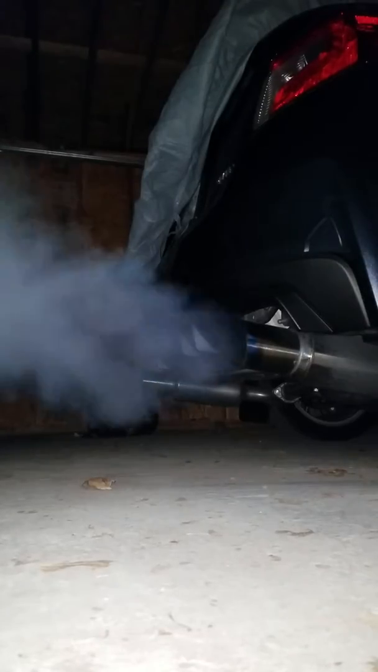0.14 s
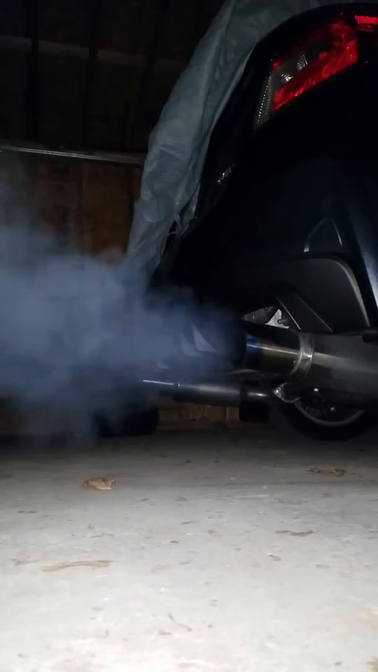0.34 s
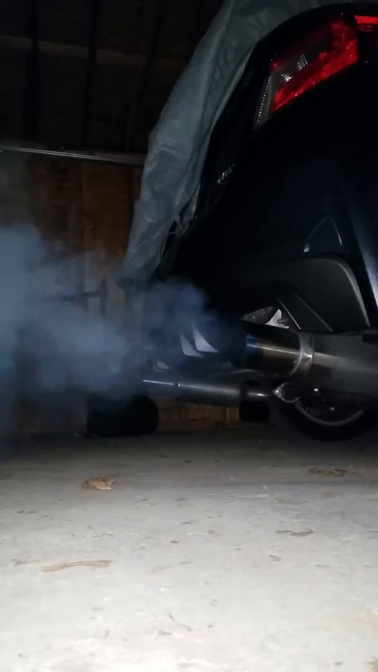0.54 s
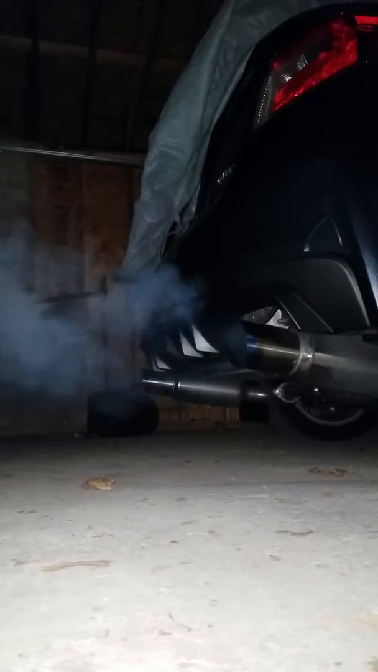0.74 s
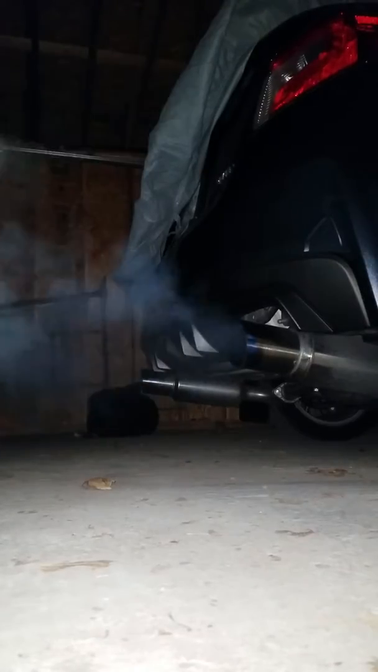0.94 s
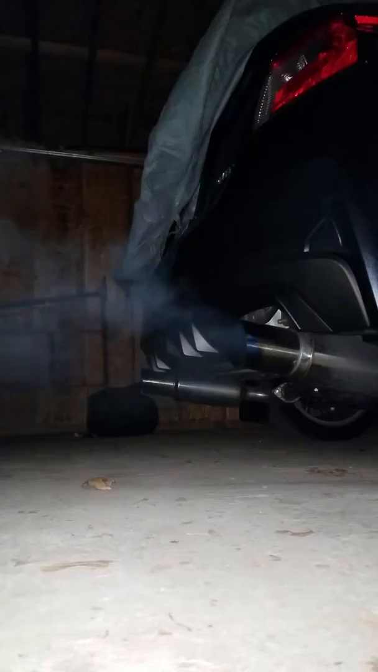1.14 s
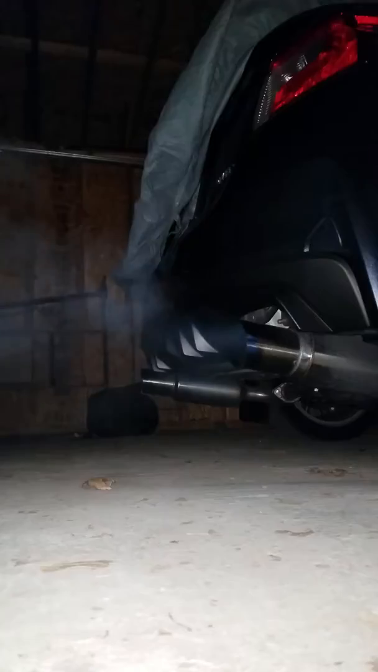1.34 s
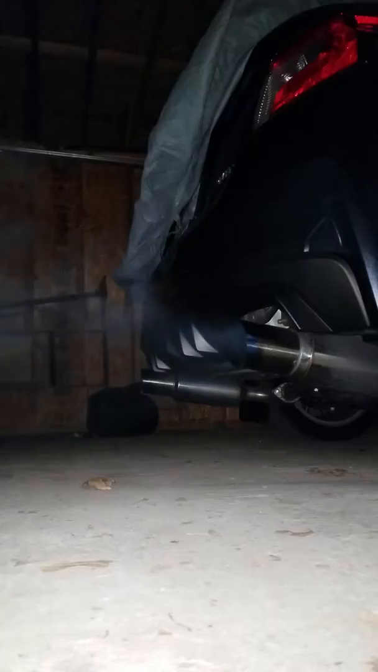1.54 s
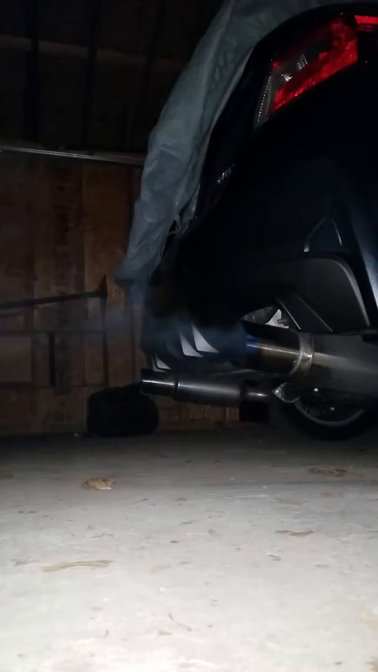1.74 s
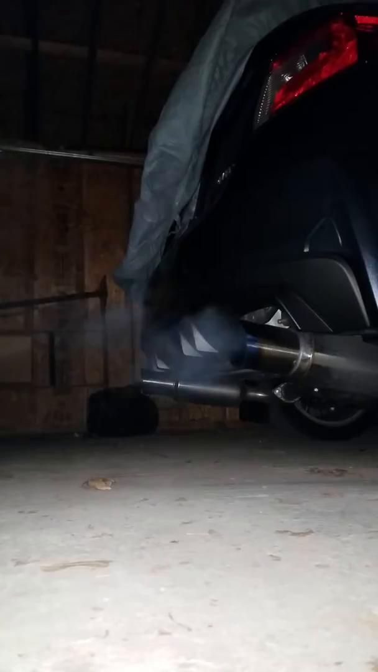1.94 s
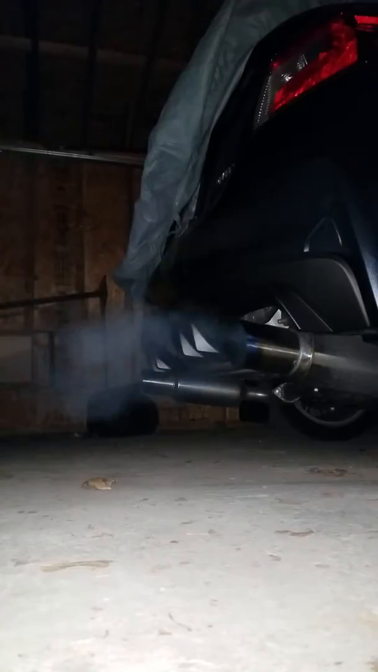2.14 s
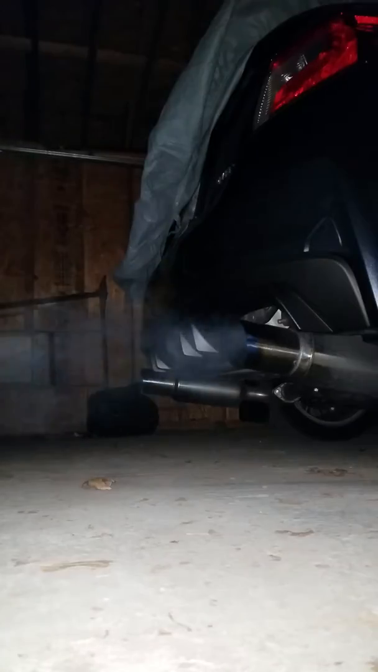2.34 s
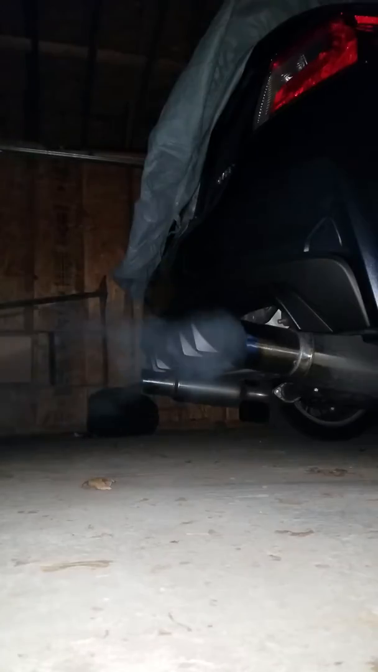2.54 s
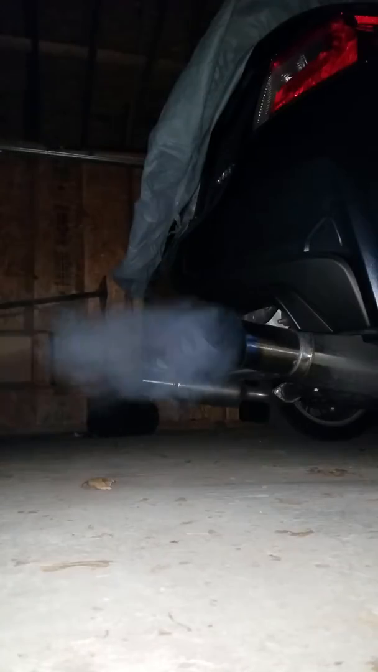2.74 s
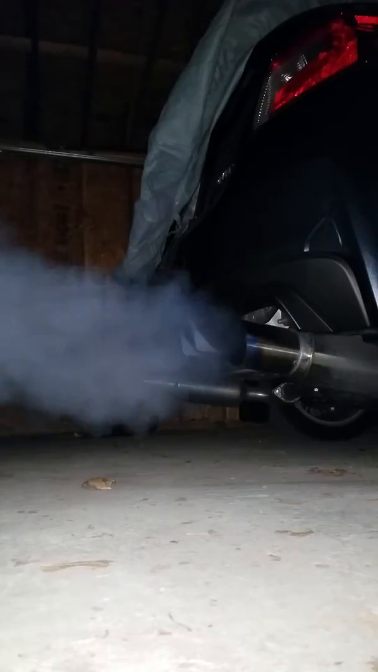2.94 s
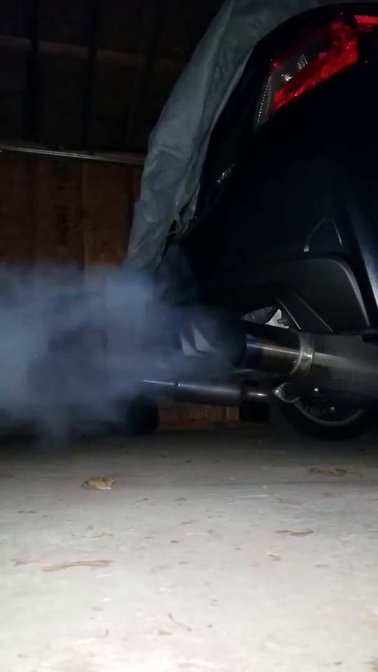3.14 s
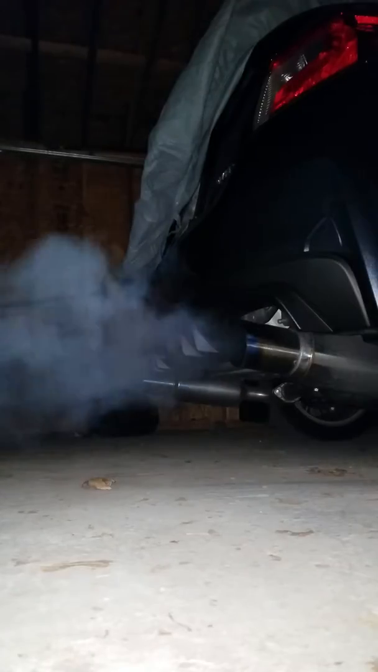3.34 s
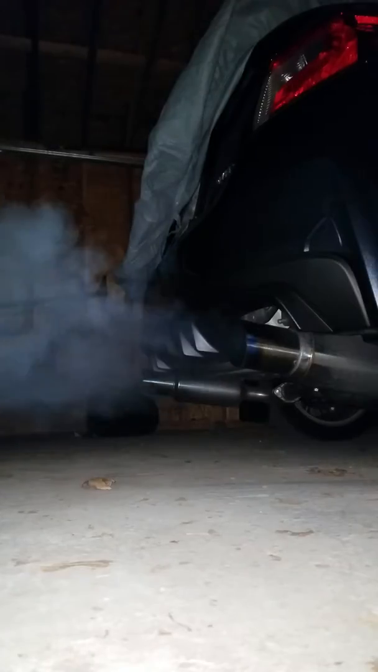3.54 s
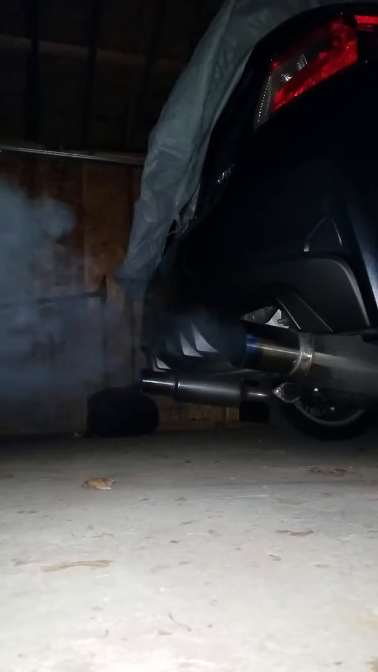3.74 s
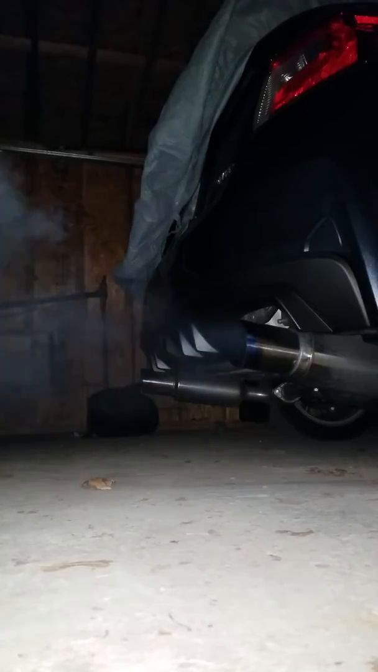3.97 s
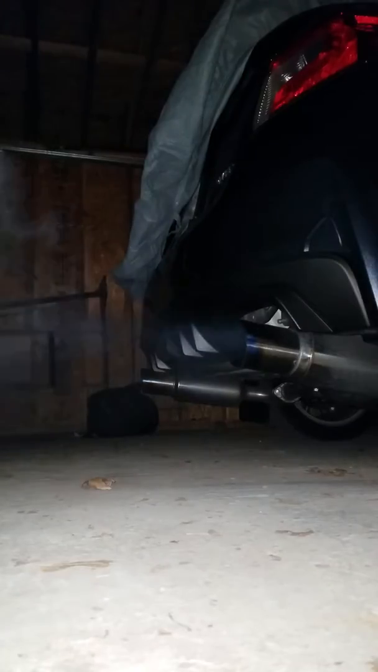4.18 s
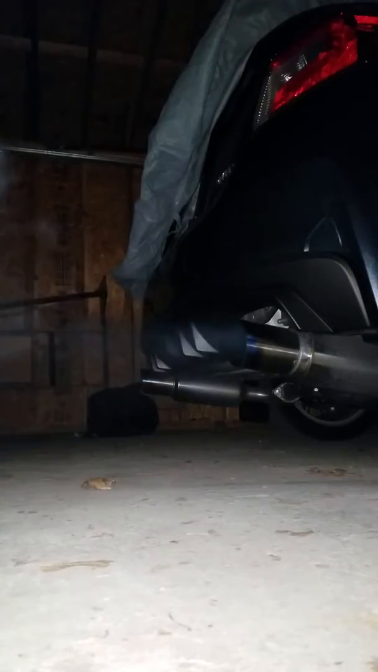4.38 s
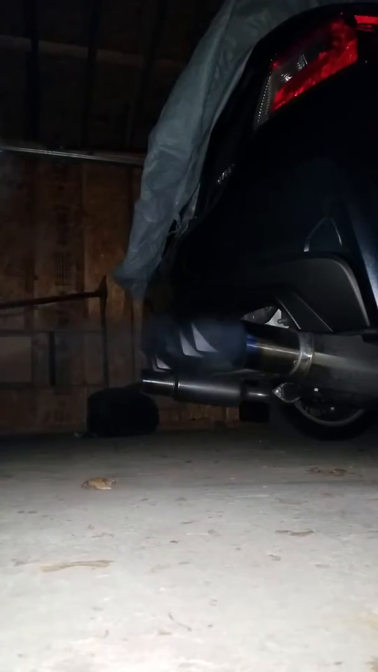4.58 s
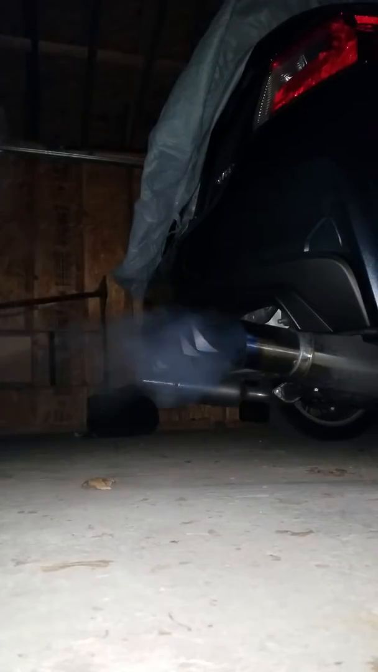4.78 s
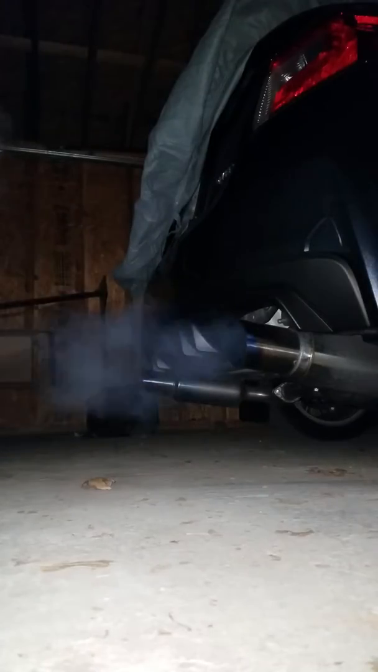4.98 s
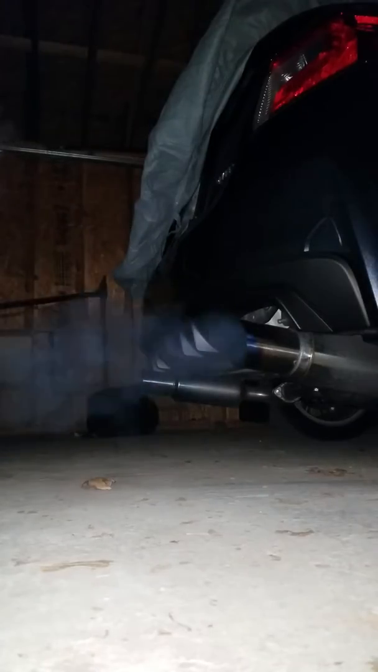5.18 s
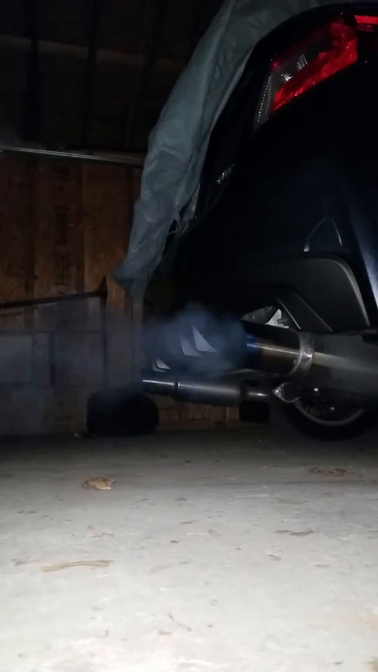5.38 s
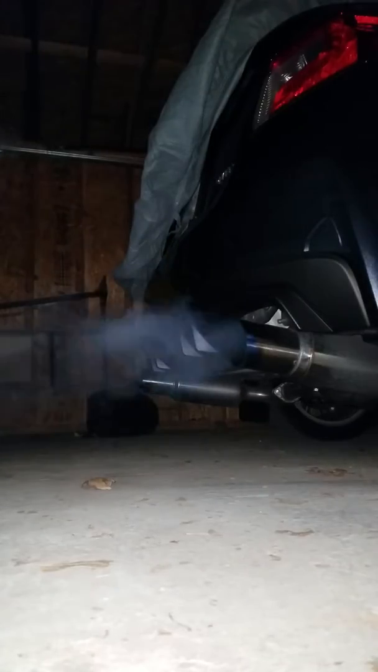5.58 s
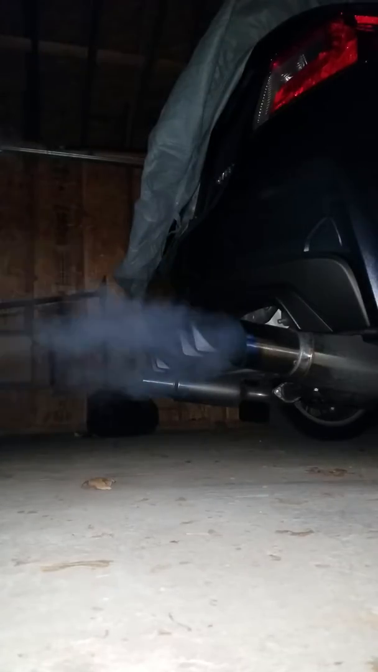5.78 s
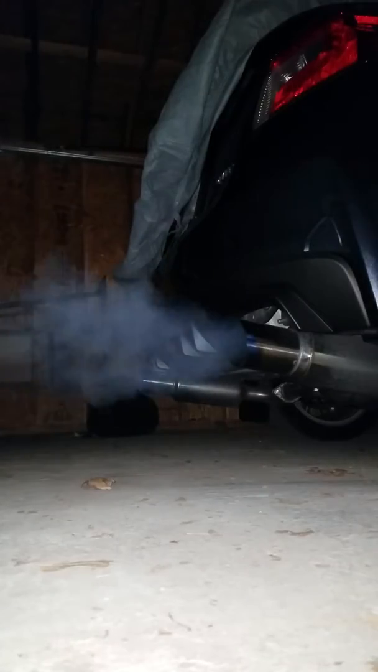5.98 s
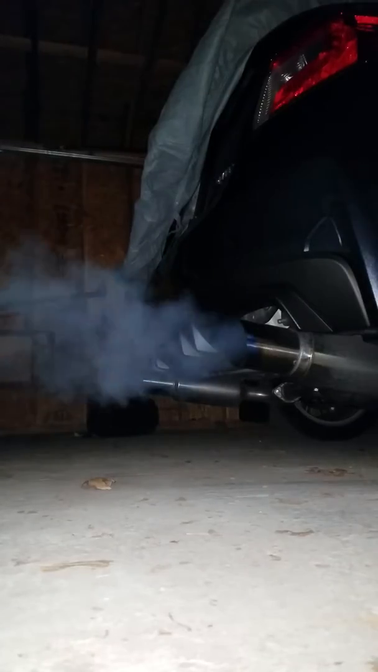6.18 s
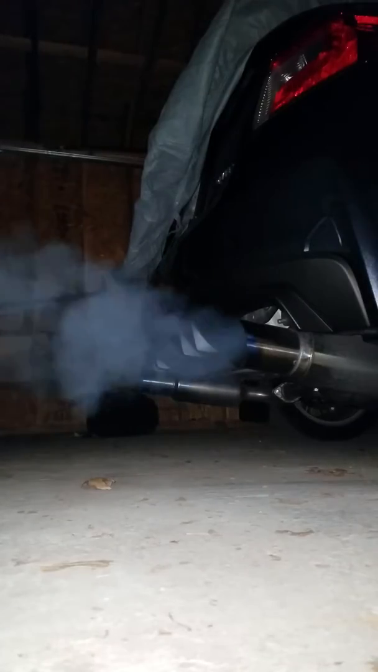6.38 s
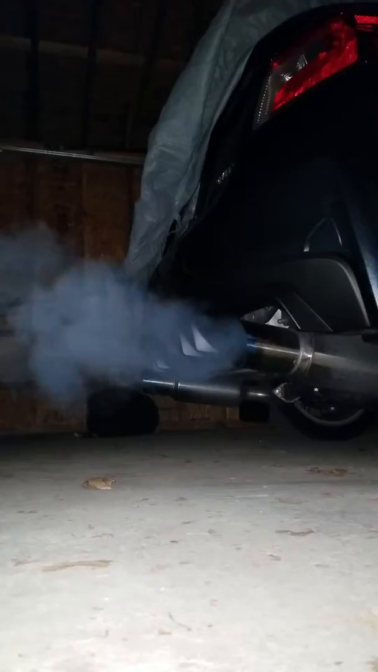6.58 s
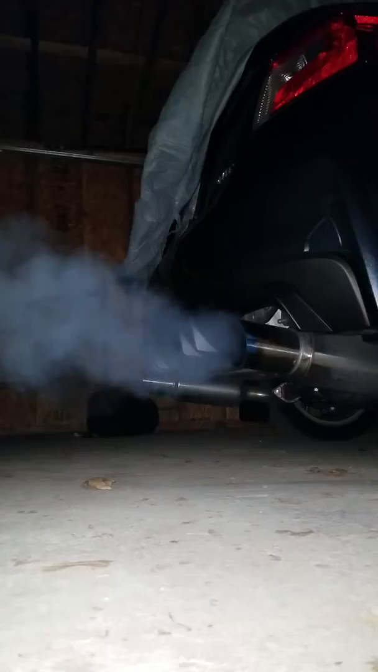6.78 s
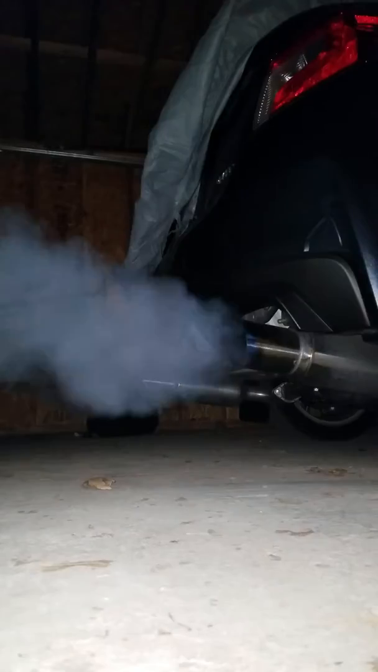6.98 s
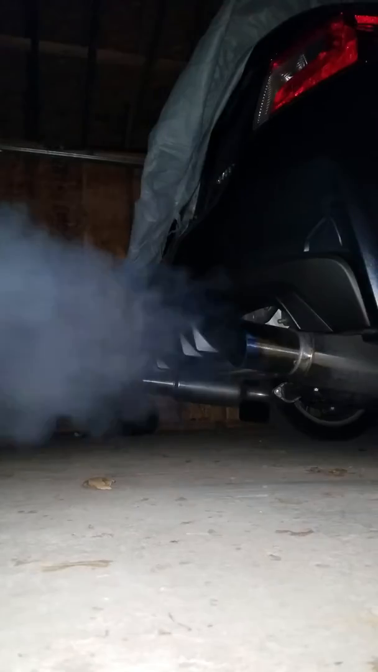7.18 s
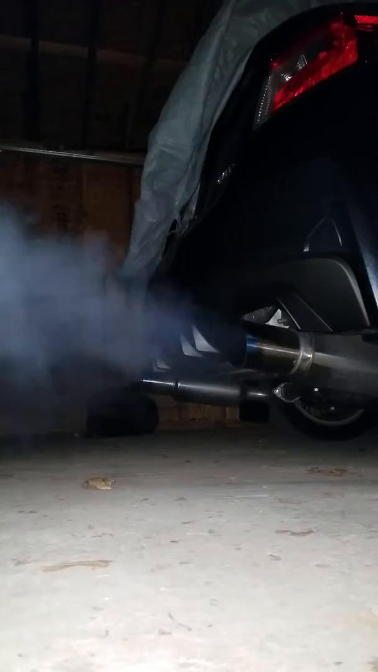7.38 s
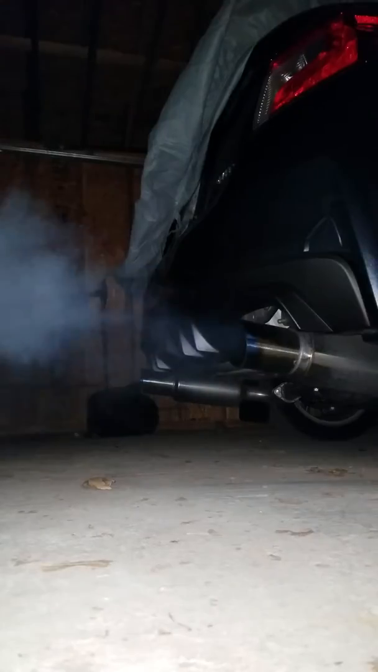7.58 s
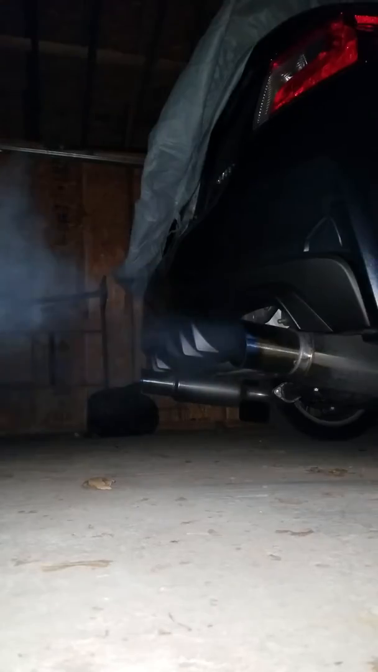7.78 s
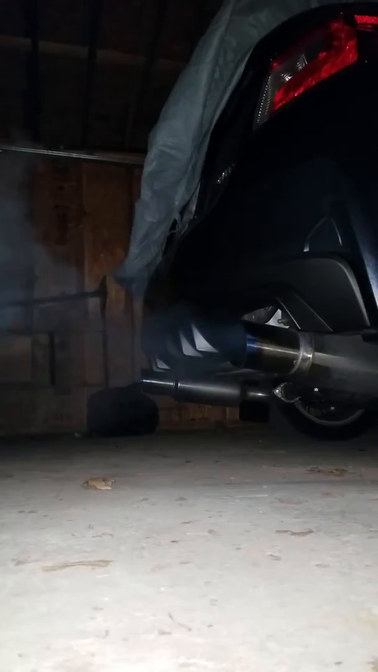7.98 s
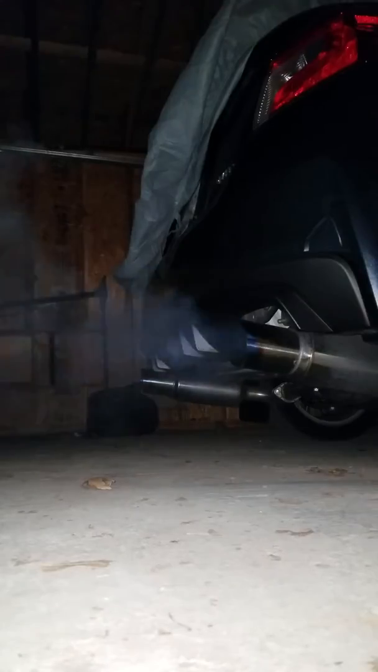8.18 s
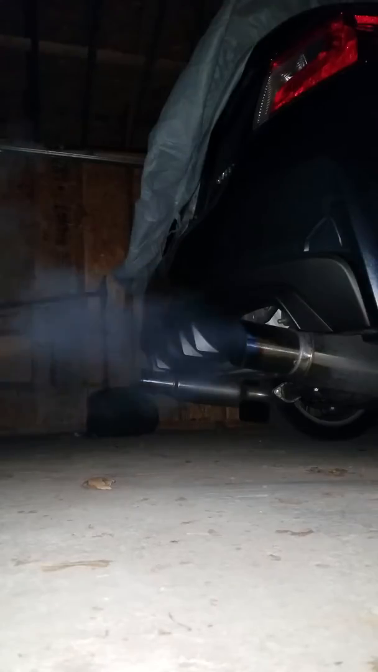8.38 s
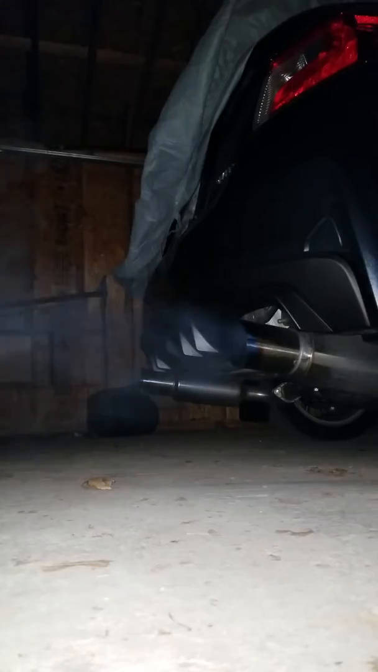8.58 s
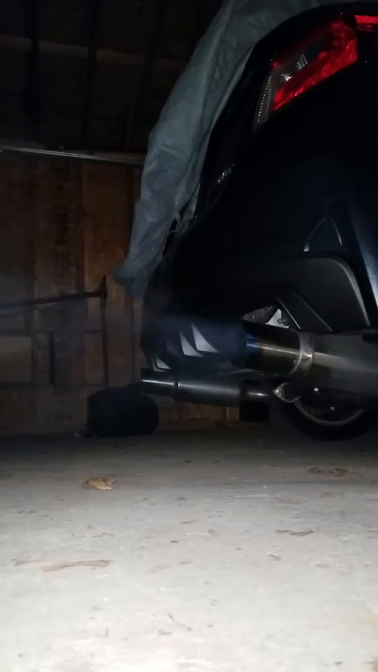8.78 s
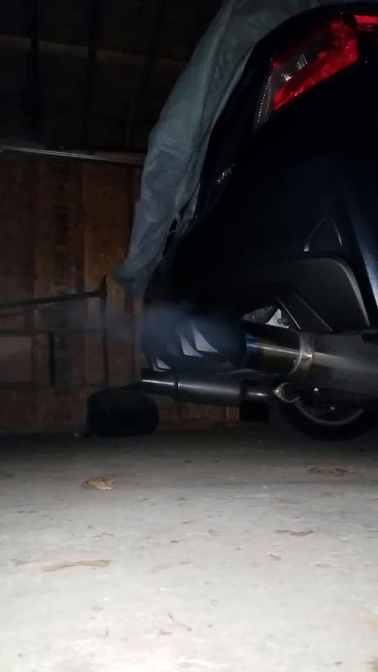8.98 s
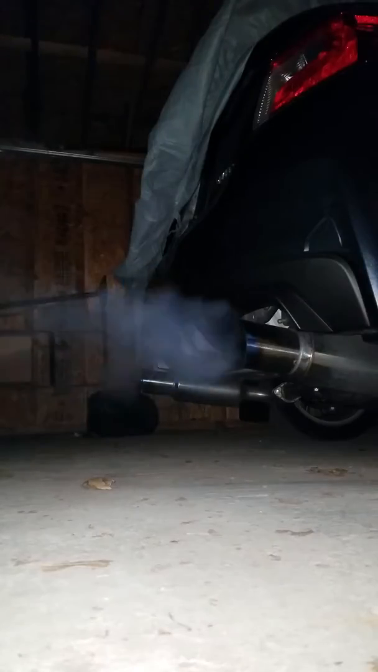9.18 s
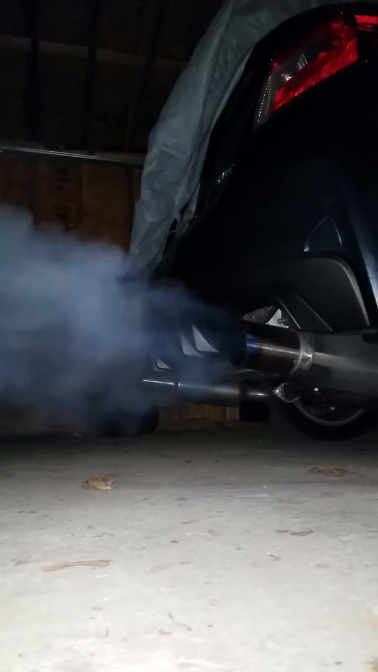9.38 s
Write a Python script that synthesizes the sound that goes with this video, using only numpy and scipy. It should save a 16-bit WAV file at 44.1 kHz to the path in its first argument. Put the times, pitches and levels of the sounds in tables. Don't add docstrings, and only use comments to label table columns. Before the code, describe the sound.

Close beside a tailpipe, a flat-four engine roars four times, sinks with dull afterfire pops and hissing air, and burbles unevenly at idle.

```python
import sys
import numpy as np
from scipy import signal
from scipy.fft import rfft, irfft, next_fast_len
from scipy.io import wavfile
from scipy.ndimage import uniform_filter1d, minimum_filter1d

SR = 44100
rng = np.random.default_rng(int(sys.argv[2]) if len(sys.argv) > 2 else 0)


def gain_from_db(level_db):
    decades = np.asarray(level_db, float) / 20
    return 10 ** decades


def generate_wav(sig):
    pcm = np.round(np.clip(np.atleast_2d(sig).T, -1, 1) * 32767).astype(np.int16)
    wavfile.write(sys.argv[1], SR, pcm)


N = 415404

# engine state, reached at in seconds,
# held in seconds, pipe trim in dB, air trim in dB.
FIRST_HALF = [("roar", 0.0, 0.085, 0.1, -1.7), ("top", 0.26, 0.065, 0.1, 0.1),
              ("cut", 0.444, .02, 0.1, 0.1), ("burble", 0.61, 0.15, 0.092, 0.1),
              ("coast", 0.868, 0.875, 0.092, 0.37), ("catch", 1.67, 0.29, 0.62, 0.11),
              ("hunt", 2.375, .12, 0.1, 0.1), ("idle", 2.4, 0.024, -2.1, 0.1),
              ("pull", 2.614, 0.056, 0.1, -1.1), ("roar", 2.82, 0.084, 0.1, 0.1),
              ("top", 3.05, 0.078, 0.1, -1.1), ("cut", 3.285, 0.023, 0.47, 0.1),
              ("burble", 3.44, 0.17, -0.47, 0.1), ("coast", 3.736, 0.65, 0.98, 0.1),
              ("catch", 4.52, 0.15, -0.54, 0.068), ("hunt", 5.0, 0.21, 0.14, 0.19)]
DRIVE = FIRST_HALF + [ ("idle", 5.33, 1.2, 0.1, 0.1), ("pull", 6.72, .1, 0.1, 0.1),
         ("roar", 7.03, .25, 1.1, 0.1), ("wail", 7.4, .64, 0.1, 0.1), ("coast", 8.17, .03, 5.1, -2.1),
         ("catch", 8.24, .06, 1.1, -6.1), ("burble", 8.4, .18, -7.1, -3.1),
         ("coast", 8.73, .36, -5.1, -1.1), ("pull", 9.16, .02, 2.1, 2.1), ("roar", 9.24, .05, 3.1, 2.1),
         ("top", 9.4, .02, 2.1, 4.1)]
PIPE_BY_STATE = {"pull": (-9, -13, -21, -27), "roar": (-14, -16, -15, -17), "top": (-17, -24, -13.5, -21.5),
                 "wail": (-13.5, -24, -14, -25), "cut": (-13.5, -26.5, -30, -31),
                 "burble": (-12, -22, -14.5, -26.5), "coast": (-11, -25, -28, -37),
                 "catch": (-17, -20.5, -22.5, -31.5), "hunt": (-14.5, -19, -23.5, -34.5),
                 "idle": (-12, -15.5, -26.5, -33.5)}
# time in seconds, peak in dB.
POPS = [(0.819, -2), (0.944, -3), (1.035, -2.5), (1.753, -2.5), (1.851, -2), (2.009, -0.5), (2.165, -5),
        (2.194, -25), (2.335, -7), (2.371, -10), (2.441, -13), (2.64, 0.5), (3.704, -6), (3.772, -4),
        (4.414, -9), (4.507, 1.5), (4.578, -1.5), (4.756, -6), (4.851, 1.5), (5.045, -2.5), (5.11, -5),
        (5.217, -8), (5.397, -20), (6.205, -12), (8.211, 6), (8.266, 0), (8.35, -14), (8.642, -22),
        (9.103, 0), (9.149, -6)]
# time in seconds, peak in
# dB.
CRACKS = [(0.545, -24), (2.579, -22), (6.425, -11), (6.7, -21), (6.833, -8), (7.902, -25), (2.719, 3.5),
          (2.762, 1), (2.783, -15), (2.836, -12), (6.879, -4), (6.942, -19), (7.0, 4), (7.035, -8),
          (7.064, 8), (7.138, 5), (7.155, 3), (7.17, -1), (9.21, -15), (9.263, -14), (9.245, -4)]
# centre in Hz, width in Hz, level in dB.
BARK_MODES = [(284.2, 17.2, -1.5), (347.1, 7.4, 5.5), (378.1, 15.6, 4), (397.7, 20.3, 2.5), (435.2, 8.5, 0)]
# centre in Hz, width in Hz, level in dB.
SNARL_MODES = [(469, 15, 2.5), (543.2, 13, 1.5), (586, 13, 5), (663.7, 37, -1.5), (754, 28, -6),
               (950, 29, -4.5), (1240, 34, -6.5)]


def rms_one(x):
    return x / np.sqrt(np.mean(x ** 2) + 1e-20)


def in_time(rows):
    s, *columns = np.transpose(rows)
    t = np.arange(N) / SR
    return [np.interp(t, s, column) for column in columns]


def at_hz(points, hz):
    points = np.array(points)
    return np.interp(np.log(hz), np.log(points[:, 0]), points[:, 1])


def along_drive(values):
    rows = []
    for (_, start, held, *_), row in zip(DRIVE, values):
        rows.append((start, *row))
        rows.append((start + max(held, .005), *row))
    return in_time(rows)


def by_state(table):
    return along_drive([np.atleast_1d(table[state]) for state, *_ in DRIVE])


def trims():
    return along_drive([(pipe_db, air_db) for *_, pipe_db, air_db in DRIVE])


def resonate(x, hz, width_hz):
    r = np.exp(-np.pi * width_hz / SR)
    poles = [1, -2 * r * np.cos(2 * np.pi * hz / SR), r * r]
    return signal.lfilter([(1 - r * r) / 2, 0, (r * r - 1) / 2], poles, x + 1e-18)


def through(x, modes):
    out = 0
    for k, (hz, width, db) in enumerate(modes):
        out = out + (-1) ** k * gain_from_db(db) * resonate(x, hz, width)
    return out


def evened(x, seconds):
    span = int(seconds * SR)
    power = uniform_filter1d(uniform_filter1d(x ** 2, span), span)
    return x / np.sqrt(power + 1e-14)


def stereo_noise(spectrum):
    # frequency in Hz, correlation.
    likeness = [(500, .9), (1000, .75), (2000, .35), (4000, .1), (12000, .2)]
    # frequency in Hz, left minus right in dB.
    left_db = [(60, -2.5), (180, 14), (550, -5.5), (1650, 0), (4970, -3.5), (15000, 2)]
    size = next_fast_len(N)
    hz = np.maximum(np.arange(size // 2 + 1) * SR / size, 1)
    mid, side = rfft(rng.standard_normal((2, size)))
    alike = at_hz(likeness, hz)
    lean = gain_from_db(at_hz(left_db, hz) * np.array([[.5], [-.5]]))
    ports = np.sqrt(1 + alike) * mid + np.sqrt(1 - alike) * side * [[1], [-1]]
    return rms_one(irfft(gain_from_db(at_hz(spectrum, hz)) * lean * ports, size)[:, :N])


def gliding_band(hz, width_hz):
    lowpass = signal.butter(2, width_hz / 2, fs=SR, output="sos")
    slow = signal.sosfilt(lowpass, rng.standard_normal((2, 2, N)))
    angle = 2 * np.pi * np.cumsum(hz) / SR
    return rms_one(slow[0] * np.cos(angle) + slow[1] * np.sin(angle))


def blows(events, modes, gain_db, bright_db):
    at = [round(s * SR) for s, _ in events]
    peak_db = np.array(events)[:, 1]
    spread = rng.standard_normal((len(at), len(modes)))
    out = np.zeros(N)
    for k, (hz, width, db) in enumerate(modes):
        clicks = np.zeros(N)
        clicks[at] = gain_from_db(peak_db + db + gain_db + bright_db * (hz > 450) + 1.35 * spread[:, k])
        out += (-1) ** k * resonate(clicks, hz, 1.4 * width)
    return out


def crankshaft():
    # time in seconds, firings per second.
    blips = [
        [(0.0, 57.1), (0.12, 70.3), (0.24, 77.4), (0.43, 79.4), (1.05, 57.4), (1.68, 45.0), (1.91, 36.4),
         (2.27, 28.8), (2.5, 28.0)],
        [(2.61, 31.1), (2.71, 39.6), (2.98, 72.8), (3.13, 77.8), (3.29, 76.6), (3.78, 58.5), (4.4, 45.5),
         (4.7, 37.8), (5.15, 27.8)],
        [(6.6, 28.9), (6.75, 33.5), (6.98, 52.0), (7.2, 93.5), (7.3, 96.8), (7.48, 89.7), (8.16, 59.8),
         (8.45, 49.8), (8.68, 46.7)],
        [(9.125, 43.8), (9.42, 87.5)],
    ]
    # time in seconds, firings per second.
    idle_hunt = [(5.43, 28.0), (5.66, 28.9), (5.9, 28.9), (6.32, 27.6)]
    flywheel_s = .04
    per_s, = in_time(sorted(sum(blips, idle_hunt)))
    per_s = uniform_filter1d(per_s, size=int(flywheel_s * SR), mode="nearest")
    turns = np.cumsum(per_s) / SR + .3
    acceleration = uniform_filter1d(np.gradient(per_s) * SR, size=2000)
    return per_s, turns, np.clip(acceleration / 110, 0, 1)


def uneven_burning(turns, per_s):
    uneven_by_state = {"pull": .45, "roar": .08, "top": .03, "wail": .03, "cut": .07, "burble": .15,
                       "coast": .11, "catch": .75, "hunt": .5, "idle": .25}
    cylinders = [-0.14, -0.19, 0.12, -0.23]
    uneven, = by_state(uneven_by_state)
    count = turns.astype(int)
    strength = gain_from_db(3.5 * rng.standard_normal(1000))[count] + np.array(cylinders)[count % 4]
    since_s = (turns % 1) / per_s
    grain = rng.standard_normal(N) + 0.13 * rng.standard_normal(1000)[count]
    puffs = np.sqrt(uneven) * rms_one(strength * np.exp(-since_s / 0.02) * grain)
    fronts = -np.diff(count, prepend=0) * np.abs(strength) ** .5
    return uneven, puffs, fronts


def exhaust_bass(turns, per_s, uneven, puffs):
    # frequency in Hz, level in dB.
    bass_response = [(25, -29.5), (38, -25), (45, 1), (51, -4), (60, 5.5), (80, 2), (100, -14.5),
                     (125, -37.5)]
    # centre in Hz, width in Hz, level in dB.
    low_modes = [(43.3, 6.3, -4.5), (52.4, 4, 0.5), (61.5, 6.1, 2.5), (77.5, 4.65, 2), (96.4, 5.9, 1)]
    # frequency in Hz, level in dB.
    second_tone = [(80, -38), (92, -39.5), (108, -22.5), (125, -25.5), (150, -21.5), (172, -33.5),
                   (195, -36)]
    second_by_state = {"pull": 2.1, "roar": 1.8, "top": 0.1, "wail": -14, "cut": 0.1, "burble": -2.1,
                       "coast": 0.1, "catch": 0.1, "hunt": 0.1, "idle": 0.1}
    angle = 2 * np.pi * turns
    tones = gain_from_db(at_hz(bass_response, per_s)) * np.cos(angle - 1.5)
    tones += gain_from_db(at_hz(bass_response, 2 * per_s) - 14.0) * np.cos(2 * angle - 1.5)
    lumps = evened(through(puffs, [(54.3, 12.0, 8.5), (77, 28, 5.0), (102.0, 3.9, -6)]), 0.99)
    lumps = signal.sosfilt(signal.butter(2, 250, fs=SR, output="sos"), lumps)
    gain = gain_from_db(by_state(PIPE_BY_STATE)[0] + .15 * trims()[0])
    bass = through(gain * evened(tones, 0.076), low_modes) + 1.1 * gain * uneven * lumps
    second_db = at_hz(second_tone, 2 * per_s) + by_state(second_by_state)[0]
    return bass + gain_from_db(second_db) * np.cos(2 * angle)


def relight():
    relight_s, relight_gain = 0.039, 1.02
    clicks, keep = np.zeros(N), np.exp(-1 / (relight_s * SR))
    clicks[[round(s * SR) for s, _ in POPS]] = gain_from_db(np.array(POPS)[:, 1])
    return 1 + relight_gain * signal.lfilter([1], [1, -keep], clicks)


def exhaust_pulses(turns, throttle, uneven, puffs, fronts):
    # order of the firing rate, level in dB.
    order_db = [(2, -1.5), (3, -3), (4, -1.5), (5, -0.5), (6, -7), (7, -10.5), (8, -11), (10, -10.5),
                (14, -24), (20, -24.5)]
    # centre in Hz, width in Hz, level in dB.
    boom_modes = [(106.2, 14.8, -3.5), (143, 8.2, 2), (171.4, 9.1, -5), (203.9, 25.6, -2.5),
                  (242.3, 14.5, -4.5)]
    orders = sum(gain_from_db(at_hz(order_db, k)) * np.cos(2 * np.pi * k * turns) for k in range(2, 21))
    steady = np.sqrt(1 - uneven) * rms_one(orders)
    boom = evened(through(steady + 11.3 * puffs, boom_modes), 0.35)
    bark = evened(through(steady + 16.6 * puffs, BARK_MODES), 0.057)
    snarl = evened(through(steady + 7.5 * puffs, SNARL_MODES), 0.056)
    edge = evened(resonate(resonate(fronts, 560, 500), 560, 500), .07)
    snarl = np.sqrt(1 - .4 * throttle) * snarl + np.sqrt(.4 * throttle) * edge
    _, boom_db, bark_db, snarl_db = by_state(PIPE_BY_STATE)
    fired = relight() * (gain_from_db(bark_db) * bark + gain_from_db(snarl_db) * snarl)
    return gain_from_db(trims()[0]) * (gain_from_db(boom_db) * boom + fired)


def gulps():
    # crest in seconds, rise of the hiss in dB.
    snaps = [
        (0.42, 1),
        (2.74, 10),
        (3.21, 2.5),
        (6.92, 5),
        (7.6, 6),
        (9.135, 20.5),
        (0.03, 1),
    ]
    rise_s, fall_s = .045, .035
    t = np.arange(0, N / SR + .002, .001)
    crest_s, crest_db = np.array(snaps).T
    late = t - crest_s[:, None]
    return in_time(np.c_[t, crest_db @ np.exp(np.minimum(late / rise_s, -late / fall_s))])[0]


def turbo(per_s, throttle, idling):
    wheel_lag_s, hz_at_rest, hz_per_firing, valve_hz = .35, 900, 23, 2550
    turbo_db, valve_db = -4, -9
    keep = np.exp(-1 / (wheel_lag_s * SR))
    wheel = signal.lfilter([1 - keep], [1, -keep], per_s - per_s[0]) + per_s[0]
    drawing = np.clip(idling + 4 * uniform_filter1d(throttle, size=6000), 0, 1)
    hz = drawing * valve_hz + (1 - drawing) * (hz_at_rest + hz_per_firing * wheel)
    db = idling * valve_db + (1 - idling) * turbo_db
    return gain_from_db(db + 3) * gliding_band(hz, 620)


def air_leaks(idling):
    # centre in Hz, width in Hz, level at idle in dB against the rush, the same at speed in dB.
    leaks = [(3640, 370, -11.5, -45.5), (4670, 350, -15.5, -27), (5770, 200, -71, -21)]
    air, out = rng.standard_normal((2, N)), 0
    for hz, width, idle_db, speed_db in leaks:
        db = speed_db + idling * (idle_db - speed_db)
        out = out + gain_from_db(db) * rms_one(resonate(air, hz, width))
    return out


def gas_flow(turns, per_s, throttle):
    # frequency in Hz, density in dB per Hz.
    rush_spectrum = [(800, -29), (1400, -5), (1800, 1), (2600, -1.5), (3000, -5.5), (4500, -12),
                     (6000, -16.5), (8800, -30.5), (11000, -55)]
    # frequency in Hz, density in dB per Hz.
    rasp_spectrum = [(290, -37.5), (500, -5.5), (590, -6.5), (813, -7), (1120, -8.5), (1230, -4.5),
                     (1380, -13.5), (1600, -16), (2080, -68), (3520, -120)]
    # frequency in Hz, density in dB per Hz.
    hiss_spectrum = [(5000, -43), (8800, -12.5), (11000, 4), (13000, -0.5), (16000, 5.5)]
    air_by_state = {"pull": (-33.5, -34, -60.5), "roar": (-35, -31, -58), "top": (-40, -42, -62.5),
                    "wail": (-37.5, -30.5, -60.5), "cut": (-35.5, -38.5, -56),
                    "burble": (-37.5, -32.5, -62), "coast": (-39, -35.5, -63),
                    "catch": (-32.5, -30.5, -58.5), "hunt": (-36, -35, -58), "idle": (-37.5, -35, -59)}
    air_lag_s = .16
    rush_db, rasp_db, hiss_db = by_state(air_by_state) + trims()[1]
    rush_db, hiss_db = uniform_filter1d([rush_db, hiss_db], size=int(air_lag_s * SR), mode="nearest")
    more_db = gulps() + 1.5 * np.clip((77 - per_s) / 4.7, 0, 1)
    rush_db, hiss_db = rush_db + .3 * more_db, hiss_db + more_db
    puff = uniform_filter1d(np.exp(-5.0 * (turns % 1)) - .2, size=60)
    idling = np.clip((45 - per_s) / 12, 0, 1)
    rush = stereo_noise(rush_spectrum) * (1 + (0.23 + 1.3 * throttle) * puff)
    rush += turbo(per_s, throttle, idling) + air_leaks(idling)
    rasp = stereo_noise(rasp_spectrum) * (1 + (0.18 + 1.0 * throttle) * puff)
    hiss = stereo_noise(hiss_spectrum) * (1 + 0.11 * puff)
    return gain_from_db(rush_db - 1.83) * rush + gain_from_db(rasp_db + 2) * rasp + gain_from_db(hiss_db + 9.5) * hiss


def garage(x, t60, low_hz):
    t = np.arange(SR // 2) / SR
    tail = rng.standard_normal((2, len(t))) * gain_from_db(-60 * t / t60) * np.minimum(t / 0.0046, 1)
    tail = signal.sosfilt(signal.butter(1, low_hz, "high", fs=SR, output="sos"), tail)
    return signal.fftconvolve(x[None], tail / np.sqrt(np.sum(tail ** 2) / 2), axes=1)[:, :N]


def pops():
    # centre in Hz, width in Hz, level in dB.
    front = [(650, 760, -30.5)]
    afterfire = blows(POPS, BARK_MODES + SNARL_MODES + front, gain_db=33.0, bright_db=-10)
    cracks = blows(CRACKS, BARK_MODES[-2:] + SNARL_MODES + front, gain_db=30.0, bright_db=-0.5)
    return afterfire + cracks


def spit():
    # centre in Hz, width in Hz, level in dB.
    spit_modes = [(2300, 900, -13)]
    return resonate(blows(CRACKS, spit_modes, gain_db=11, bright_db=0), 2300, 2500)


def intake_hoot(turns):
    # time in seconds, pitch in Hz, level in dB.
    hoots = [
        [(2.0, 1295, -33), (2.088, 1240, -21.5), (2.176, 1240, -34), (2.328, 1241, -30.5), (2.6, 1052, -45)],
        [(2.64, 1140, -23), (2.732, 1165, -27.5), (2.86, 959, -55)],
        [(4.85, 1078, -37), (4.918, 1204, -36), (5.03, 1240, -29), (5.038, 1240, -23.5), (5.164, 1210, -35.5),
         (5.346, 1026, -37.5), (5.6, 950, -36), (6.4, 870, -46)],
    ]
    (s, hz, db), sounding = np.concatenate(hoots).T, 0
    t = np.arange(N) / SR
    for rows in hoots:
        inside_s = np.minimum(t - rows[0][0], rows[-1][0] - t)
        sounding = sounding + np.clip(inside_s / 0.081, 0, 1)
    throb = 1 + .4 * np.cos(2 * np.pi * turns - 1.5)
    return gain_from_db(np.interp(t, s, db)) * sounding * throb * gliding_band(np.interp(t, s, hz), 55)


def scene():
    per_s, turns, throttle = crankshaft()
    uneven, puffs, fronts = uneven_burning(turns, per_s)
    bass = exhaust_bass(turns, per_s, uneven, puffs)
    pulses = exhaust_pulses(turns, throttle, uneven, puffs, fronts) + pops()
    pulses = signal.sosfilt(signal.butter(4, 1400, fs=SR, output="sos"), pulses)
    near = pulses * gain_from_db(np.array([[-1.5], [1.5]]))
    flow = gas_flow(turns, per_s, throttle) + spit()
    near[1], flow[1] = np.roll(near[1], 4), np.roll(flow[1], 10)
    echoes = gain_from_db(-23.5) * garage(pulses, t60=0.33, low_hz=870)
    return bass * gain_from_db(np.array([[-.6], [.6]])) + near + flow + echoes + intake_hoot(turns)


def low_pass(x):
    return signal.sosfilt(signal.butter(12, 16250, fs=SR, output="sos"), x)


def record(dry):
    dry = signal.sosfilt(signal.butter(2, 34, "high", fs=SR, output="sos"), dry)
    dry = signal.sosfilt(signal.ellip(10, .5, 60, 15750, fs=SR, output="sos"), dry)
    allowed = np.minimum(1, .96 / (np.abs(dry).max(axis=0) + 1e-9))
    gain = uniform_filter1d(minimum_filter1d(allowed, size=400), size=300)
    return low_pass(dry * gain)


dry = scene()
out = record(dry)
generate_wav(out)
```